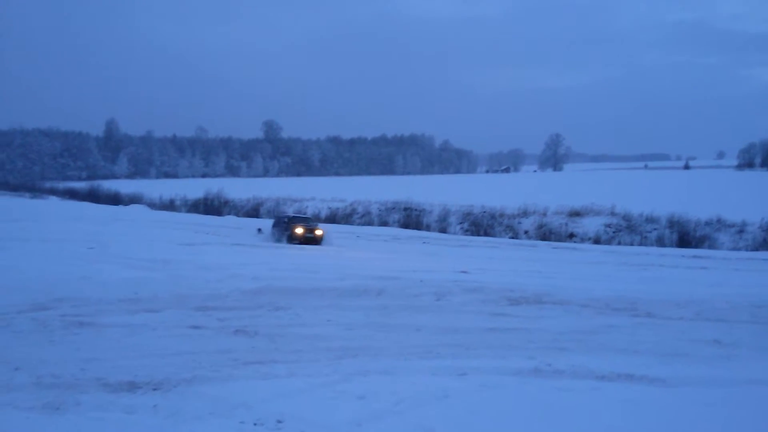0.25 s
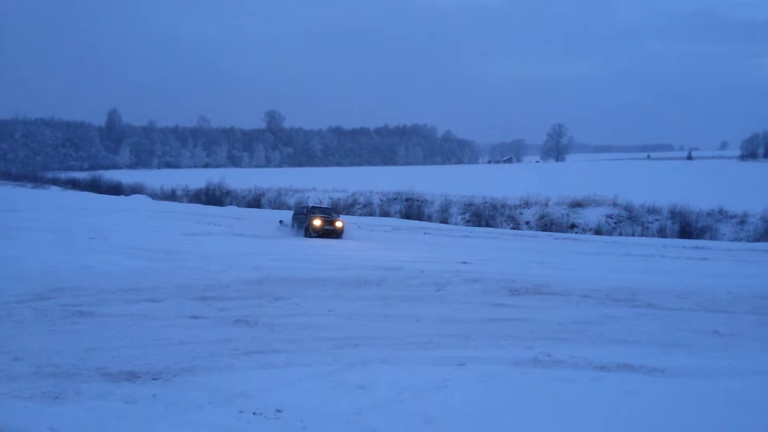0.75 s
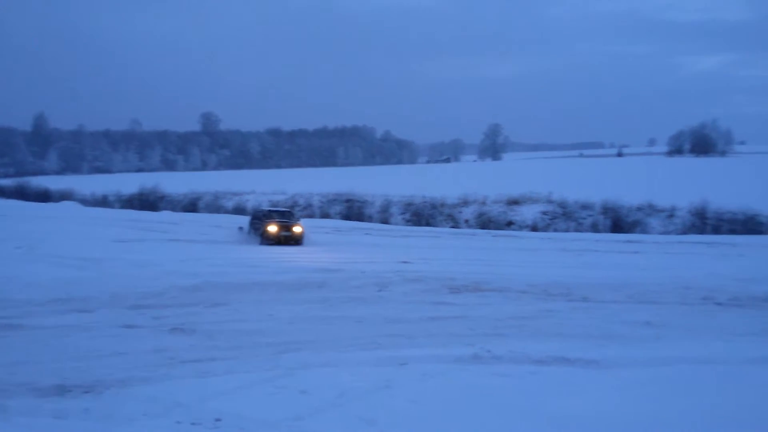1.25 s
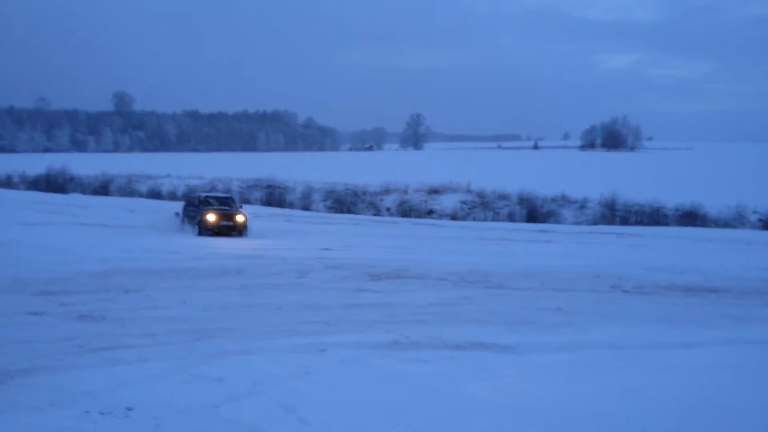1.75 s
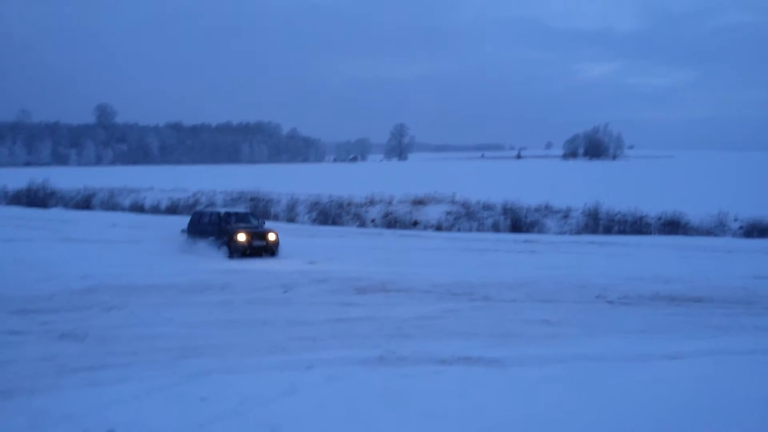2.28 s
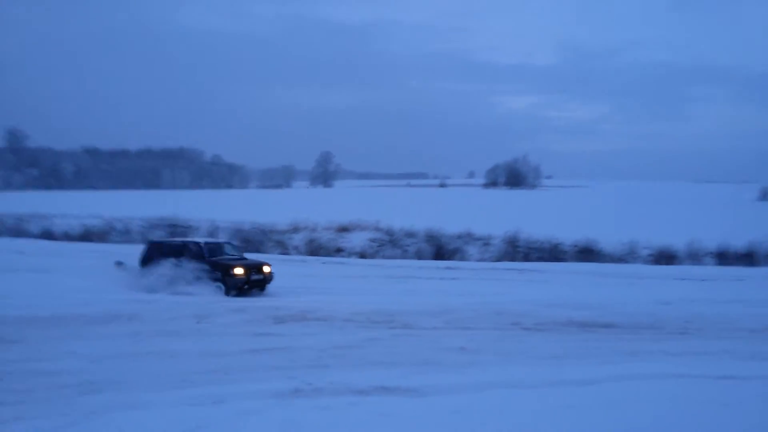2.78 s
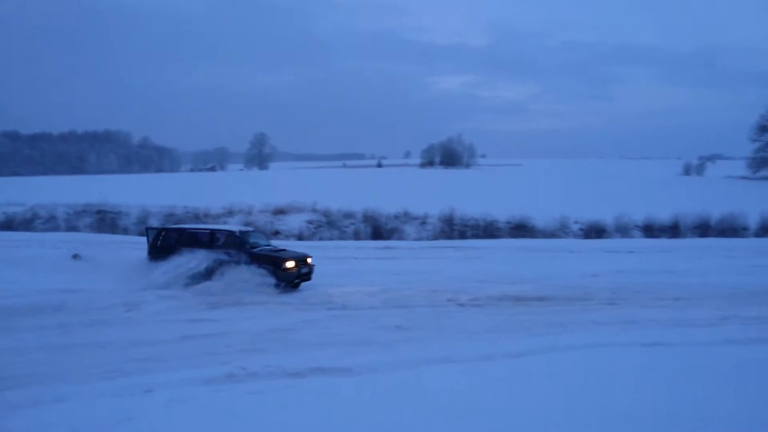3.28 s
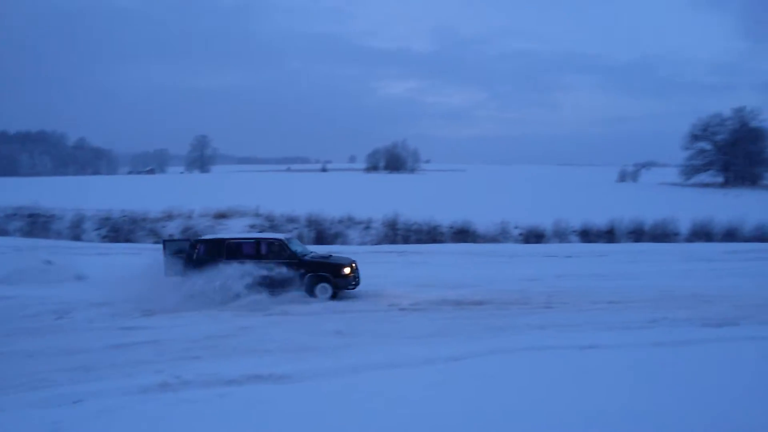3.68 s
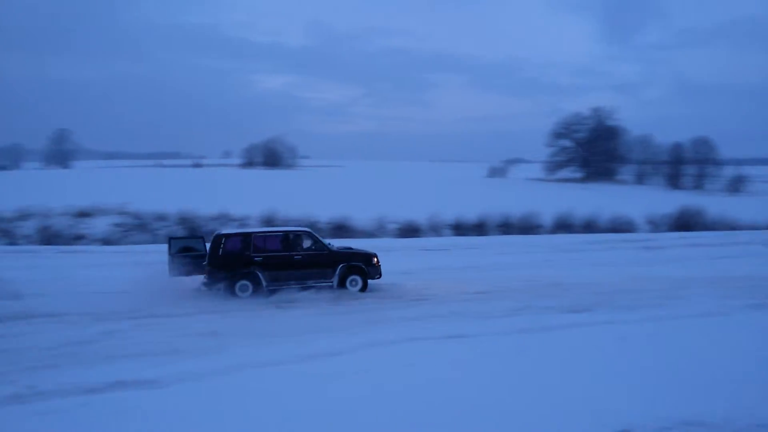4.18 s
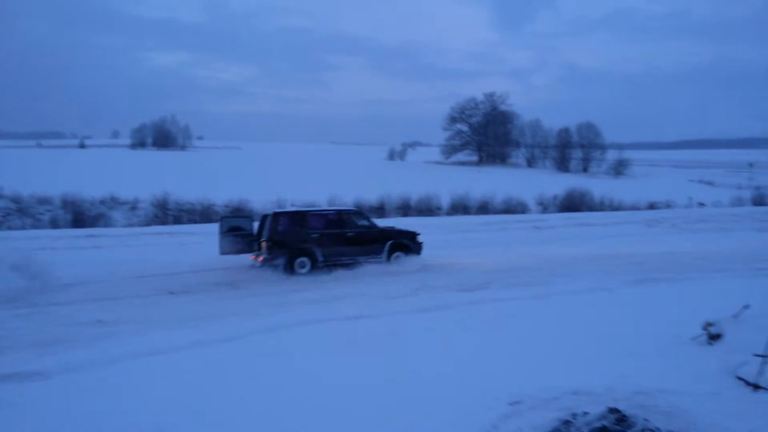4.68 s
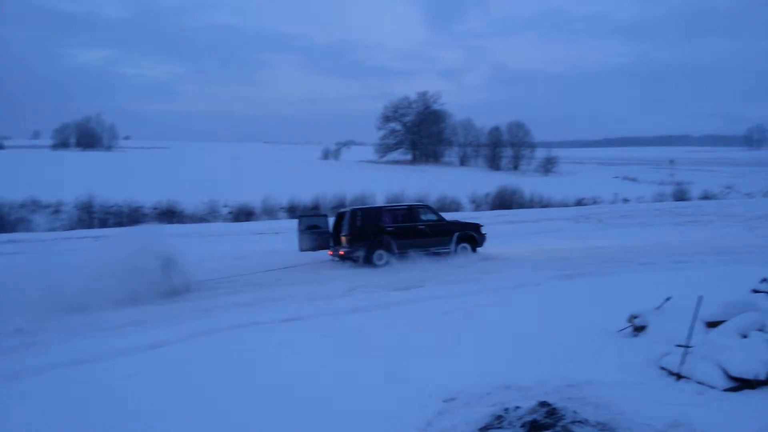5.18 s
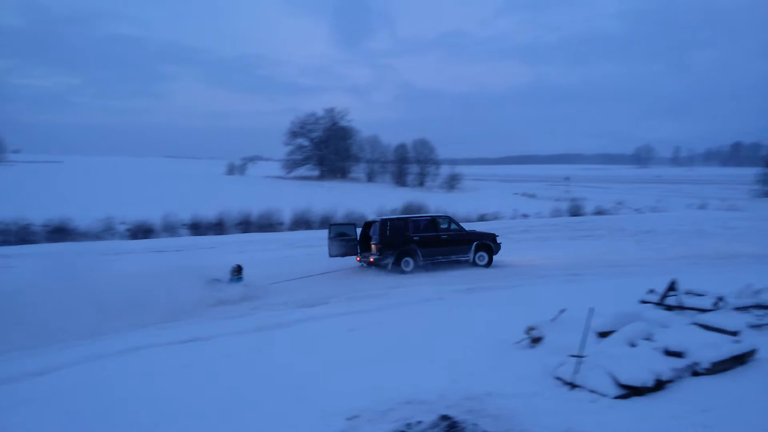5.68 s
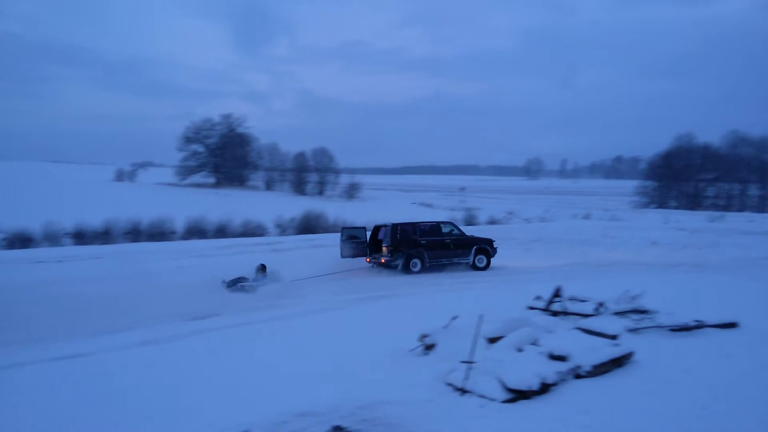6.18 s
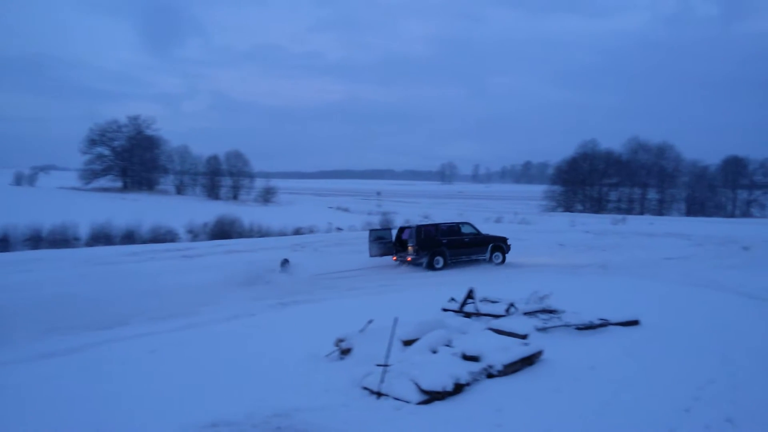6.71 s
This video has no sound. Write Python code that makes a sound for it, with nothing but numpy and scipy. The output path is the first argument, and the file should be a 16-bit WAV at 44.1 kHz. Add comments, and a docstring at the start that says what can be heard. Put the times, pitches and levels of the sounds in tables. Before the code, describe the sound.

An off-road car drones closer across a snowy field, clattering and churning snow, then pulls away with a rasping exhaust as wind buffets the microphone.

```python
"""A snowy field, with an off-road car driving past a hand-held camera.
The car drones closer as multiples of its firing rate, its wheels churning snow as noise that puffs with
each firing, and clatters as short metallic modes. It eases off twice, and pulls away with a rasping exhaust,
gas noise through resonances, before easing off again. Gusts of low noise buffet and thump the microphone;
open air lies behind, and the camera adds a thin high hiss and a few ticks."""
import sys
import numpy as np
from scipy import signal
from scipy.fft import rfft, irfft
from scipy.io import wavfile
from scipy.ndimage import map_coordinates

SR = 44100
rng = np.random.default_rng(int(sys.argv[2]) if len(sys.argv) > 2 else 0)


def transcribe(u):
    """Save the signal u as a 16-bit wav file named by the first command-line argument.

    u: samples, shape (n,) or (channels, n), limited to [-1, 1]; the rate is SR.
    q: integer samples, one column per channel.
    """
    v = np.clip(np.atleast_2d(u).T, -1, 1)
    q = np.round(v * 32767).astype(np.int16)
    wavfile.write(sys.argv[1], SR, q)


N = 306450
TIME = np.arange(N) / SR
BINS = np.fft.rfftfreq(N, 1 / SR)

# Metal parts of the car that ring when knocked.
# Each row: pitch in Hz, relative level in dB, time to fall by 60 dB in seconds.
METAL_MODES = [(1460, -7.5, 0.0068), (1870, -8.5, 0.014), (2320, 4, 0.02), (2437, 13.5, 0.018),
               (2620, 5, 0.032), (3190, 1, .016), (3570, 1, 0.015)]
# Which microphone port the wind strikes harder. Each row: time in seconds, left minus right in dB.
WIND_SIDE = [(0, 21), (1.35, -23), (4.55, -2.5), (5.3, 9), (5.85, -0.5), (6.5, 7.5), (6.95, 6)]
FRESHEN_S, BLOWING_S = 1.94, 5.92  # the wind begins to freshen, and reaches its steady blow


def amp(db):
    """Decibels to gain."""
    return 10 ** (np.asarray(db) / 20)


def evened(x):
    """Scales to rms 1."""
    return x / np.sqrt(np.mean(x ** 2) + 1e-20)


def curves(rows):
    """Each column of a table of times, joined by straight lines."""
    s, *columns = np.transpose(rows)
    return [np.interp(TIME, s, column) for column in columns]


def read(points):
    """A table of (Hz, value) on the frequency bins, joined by straight lines over log frequency."""
    hz, value = np.transpose(points)
    return np.interp(np.log(BINS + 1), np.log(hz + 1), value)


def colour(x, gain):
    """Filters by a gain per bin, at rms 1."""
    return evened(irfft(rfft(x) * gain, N))


def wander(per_s):
    """Smooth chance of rms 1, up to about the given rate."""
    return colour(rng.standard_normal(N), np.exp(-(BINS / per_s) ** 2))


def add(mix, s, sound):
    """Mixes a sound in at a time."""
    part = mix[max(round(s * SR), 0):][:len(sound)]
    part += sound[:len(part)]


def swells(events):
    """One smooth bump of height 1 per row: centre in seconds, seconds from there to 1/e, then others."""
    return np.array([np.exp(-((TIME - s) / length) ** 2) for s, length, *_ in events])


def resonances(modes):
    """Gain per bin of steep resonances; each row: Hz, half-width at -6 dB in Hz, level in dB."""
    powers = [amp(db) ** 2 / (1 + ((BINS - hz) / width) ** 2) ** 2 for hz, width, db in modes]
    return np.sqrt(sum(powers))


def resonate(x, hz, width):
    """A steep resonance of gain 1 that follows the curve hz, by shifting that pitch to zero and back."""
    turn = np.exp(2j * np.pi * np.cumsum(hz) / SR)
    r = np.exp(-np.pi * width / SR)
    smoothed = signal.lfilter([(1 - r) ** 2], [1, -2 * r, r * r], x * turn.conj())
    return 2 * (turn * smoothed).real


def narrow_swells(x, rows, width_hz):
    """Narrow bands of a noise that swell and fade; each row: centre s, seconds to 1/e, dB, Hz."""
    out = 0
    for swell, (_, _, db, hz) in zip(swells(rows), rows):
        out = out + amp(db) * swell * colour(x, resonances([(hz, width_hz / 2, 0)]))
    return out


def noise_pair():
    """White noise at the two microphone ports, less alike in the treble."""
    # Each row: frequency in Hz, left-right likeness from 0 to 1.
    likeness = [(60, 0.99), (300, 0.91), (700, 0.88), (1400, 0.82), (2200, 0.49), (3200, 0.47),
                (6500, 0.042)]
    a, b = rfft(rng.standard_normal((2, N)))
    same = np.clip(read(likeness), -1, 1)
    return irfft(np.array([a, same * a + np.sqrt(1 - same ** 2) * b]), N)


def passing():
    """The straight drive past: dB from distance, and aspect from -1 (head on) to 1 (from behind)."""
    nearest_s, pass_per_s = 3.92, 0.53  # time of the nearest point; speed in nearest distances per second
    along = pass_per_s * (TIME - nearest_s)
    distance = np.hypot(1, along)
    return -20 * np.log10(distance), along / distance


def throttle():
    """How far the throttle is shut, and how much power is still missing after it reopens (0-1 each)."""
    # The driver lifts off. Each row: start, end in seconds.
    lifts = [(3.53, 3.83), (5.172, 5.41), (6.862, 7.1)]
    close_s, open_s, rebuild_s = 0.054, 0.054, 0.18
    shut, lag = np.zeros(N), np.zeros(N)
    for start, end in lifts:
        closing = np.clip((TIME - start) / close_s, 0, 1)
        since = np.maximum(TIME - end, 0)
        shut += closing * np.clip(1 - since / open_s, 0, 1)
        lag += closing * np.exp(-(since / rebuild_s) ** 4)
    return shut, lag


def heard(abeam_db, astern_db, shut_db, lag_db):
    """Level in dB of one voice of the car: its level abeam, changed by distance, aspect and throttle."""
    distance_db, aspect = passing()
    shut, lag = throttle()
    return abeam_db + distance_db + astern_db * aspect + shut_db * shut + lag_db * lag


def puffs(turns, depth, uneven_db):
    """One swell per firing; sizes follow a cycle of four firings, and every stroke differs by chance."""
    stroke = turns.astype(int)
    size_db = uneven_db * (np.cos(np.pi * stroke / 2) + rng.uniform(-3, 0, N)[stroke])
    return evened(1 + depth * amp(size_db) * np.sin(np.pi * turns) ** 4)


def drone(turns):
    """The firing tone and its multiples, firm under load; most waver more in wind and off the throttle."""
    # The firing tone under load. Each row: time in seconds, rms level in dB.
    first_level = [(0.0, -40), (0.2, -35), (2.07, -35.5), (2.45, -30), (2.8, -31), (3.2, -32), (3.5, -34),
                   (3.82, -41), (3.9, -30.5), (4.15, -35), (4.55, -29), (4.7, -35), (4.8, -46), (4.88, -29),
                   (5.1, -48), (5.44, -42), (5.52, -37), (5.85, -37.5), (6.1, -35), (6.4, -41),
                   (6.68, -29.5), (6.85, -58), (6.95, -56)]
    # The octave above it. Each row: time in seconds, rms level in dB.
    octave_level = [(0, -54), (1.2, -47.5), (2, -44), (3.2, -42.5), (3.45, -37), (3.6, -44.5), (3.8, -44.5),
                    (3.9, -34.5), (4.2, -34.5), (4.5, -33), (4.95, -32.5), (5.15, -36), (5.22, -43),
                    (5.3, -37), (5.42, -44), (5.5, -31), (5.68, -29.5), (5.85, -33), (6.6, -34),
                    (6.95, -42.5)]
    # Weaker engine orders. Each row: multiple of the firing rate, dB against the octave.
    overtones = [(2.25, -16), (2.5, -21.5), (3, -20), (5, -30), (5.25, -24), (5.5, -18.5), (5.75, -24.5),
                 (6.25, -25), (7.5, -29), (9, -30.5)]
    # The third harmonic sings out: centre in seconds, seconds to 1/e, peak rms level in dB.
    third_swell = (4.686, 0.23, -48)
    # Throb between the firing tone and its octave: multiple of the firing rate, dB against that tone.
    throb_order = (1.5, -6.5)
    first_db, octave_db = curves(first_level)[0], curves(octave_level)[0]
    angle, overrun = 2 * np.pi * turns, throttle()[0]
    windy = np.clip((TIME - FRESHEN_S) / (BLOWING_S - FRESHEN_S), 0, 1) ** 0.67
    waver_db = .35 + .7 * windy + 1.5 * overrun
    slip = .12 * windy + .3 * overrun  # radians
    firing = amp(first_db - 2 * overrun + waver_db * wander(28)) * np.cos(angle + slip * wander(32))
    octave = amp(octave_db + waver_db * wander(14)) * np.cos(2 * angle + slip * wander(12))
    third = amp(third_swell[2]) * swells([third_swell])[0] * np.cos(3 * angle + slip * wander(12))
    multiple, throb_db = throb_order
    throb = windy * amp(first_db + throb_db + 4.26 * wander(23)) * np.cos(multiple * angle + wander(36))
    upper = 0
    for k, db in overtones:
        phase = (0.3 + .55 * windy) * wander(12) + 2 * np.pi * rng.random()
        upper = upper + amp(db + 3.6 * wander(13)) * np.cos(k * angle + phase)
    return np.sqrt(2) * (firing + octave + third + throb + amp(octave_db) * upper)


def gas_flow(turns, steady):
    """Exhaust turbulence, part of which repeats with each engine cycle of four firings."""
    cycle = rng.standard_normal(2048)
    repeating = map_coordinates(cycle, [turns / 4 * len(cycle)], order=3, mode="grid-wrap")
    share = np.clip(steady / (1 + (BINS / 3800) ** 2), 0, 1)
    return irfft(np.sqrt(share) * rfft(repeating) + np.sqrt(1 - share) * rfft(noise_pair()), N)


def exhaust(turns):
    """Puffs of gas boom in the silencer, ring the pipe, set off a gliding whine and roar at the mouth."""
    # Silencer resonances. Each row: pitch in Hz, half-width at -6 dB in Hz, relative level in dB.
    silencer = [(345, 35, -15), (426, 28, 0), (475, 33, -12), (590, 45, -7.5)]
    # Pipe resonances before drift. Each row: pitch in Hz, half-width at -6 dB in Hz, relative level in dB.
    pipe_modes = [(687.4, 36, 4), (999, 60, 5), (1119, 57, 4.5), (1428, 44, 7), (1565, 34, 6),
                  (1635, 70, 3.5)]
    # How strongly the pipe rings. Each row: time in seconds, level in dB.
    rasp_level = [(0, -63), (3.8, -59), (4.25, -54), (4.55, -45), (5.0, -42.5), (5.19, -46.5), (5.29, -62),
                  (5.41, -59), (5.45, -48), (5.85, -46), (5.97, -41.5), (6.45, -44.5), (6.6, -43.5),
                  (6.86, -43.5), (6.93, -53)]
    # The whine, before its waver and trim. Each row: time in seconds, pitch in Hz, level in dB.
    whine_glide = [(2.3, 1523, -74.5), (3.0, 1522, -52.5), (3.3, 1447, -50), (3.5, 1510, -54),
                   (3.7, 1450, -68), (4.3, 1520, -53), (4.41, 1530, -43.5), (4.52, 1504, -53),
                   (4.78, 1553, -53), (5.0, 1606, -57.5), (5.16, 1550, -64), (5.25, 1490, -61),
                   (5.42, 1520, -64), (5.5, 1520, -51), (5.85, 1540, -52), (5.94, 1514, -34),
                   (6.02, 1590, -60), (6.1, 1505, -34), (6.17, 1527, -53), (6.32, 1495, -51),
                   (6.41, 1497, -39), (6.5, 1517, -51), (6.56, 1550, -34.5), (6.61, 1590, -48.5),
                   (6.65, 1564, -32.5), (6.69, 1614, -50.5), (6.85, 1600, -57), (6.95, 1496, -60)]
    # Colour of the roar at the mouth. Each row: frequency in Hz, relative level in dB per Hz.
    mouth_colour = [(700, -22.5), (1500, -22), (1780, 1), (1960, 6), (2100, 2.5), (2270, 6.5), (2450, -4),
                    (2700, -0.5), (2950, -5.5), (3200, -3.5), (3750, -14.5), (4400, -10.5), (5200, -19),
                    (6300, -23), (7500, -88)]
    # Level of that roar. Each row: time in seconds, level in dB.
    roar_level = [(0, -83), (3.9, -66.5), (4.4, -53.5), (4.75, -50), (5.0, -45), (5.17, -49), (5.25, -60),
                  (5.415, -62.5), (5.45, -46), (5.68, -50), (5.83, -46), (6.2, -42.5), (6.45, -43.5),
                  (6.68, -44.5), (6.87, -43.5), (6.93, -54)]
    # Brief flares at one pitch. Each row: centre in seconds, seconds to 1/e, level in dB, pitch in Hz.
    flare_rows = [(4.65, 0.14, -57, 1470), (4.27, 0.067, -53.5, 417), (4.81, 0.047, -45, 430),
                  (5.57, 0.15, -52.5, 600), (5.815, .02, -48, 2150), (5.88, 0.012, -44.5, 1983),
                  (6.073, 0.021, -45, 2159), (6.448, 0.03, -41.5, 1440), (6.774, .07, -54, 3248)]
    pipe_drift, whine_waver = 0.0078, 0.011  # rms shares of the pitch
    whine_trim_db = -3.5

    gas = gas_flow(turns + .01 * wander(9), steady=.85) * puffs(turns, depth=.7, uneven_db=2.6)
    pipe = 0
    for hz, width, db in pipe_modes:
        drifting_hz = hz * (1 + pipe_drift * wander(6.8))
        pipe = pipe + amp(db + 2 * wander(10)) * resonate(gas, drifting_hz, 2 * width)
    ring = amp(curves(rasp_level)[0] + 0.87 * wander(21)) * evened(pipe)
    boom_db = heard(abeam_db=-49.5, astern_db=8.5, shut_db=-8.0, lag_db=-5.0)
    boom = amp(boom_db) * colour(gas, resonances(silencer))
    whine_hz, whine_db = curves(whine_glide)
    whine = evened(resonate(gas, whine_hz * (1 + whine_waver * wander(16.0)), width=87))
    whine *= amp(whine_db + whine_trim_db + 1.7 * wander(21))
    roar = amp(curves(roar_level)[0] + .5 * wander(14)) * colour(gas, amp(read(mouth_colour)))
    flaring = narrow_swells(gas, flare_rows, width_hz=250)
    beat = evened(1 + .1 * np.cos(2 * np.pi * turns - np.pi) + .12 * np.cos(4 * np.pi * turns))
    return boom + (ring + whine) * beat + roar + flaring


def spinning():
    """The dB that the spinning wheels add to the churn."""
    # Each row: centre in seconds, seconds to 1/e, dB added.
    wheelspins = [(2.46, 0.58, 5), (3.06, 0.23, 2.5), (3.525, 0.18, 3.5)]
    return np.transpose(wheelspins)[2] @ swells(wheelspins)


def churn(turns):
    """Engine roar and thrown snow as puffing noise, louder in wheelspin, with a rumble in deep snow."""
    # Seen from the front. Each row: frequency in Hz, relative level in dB per Hz.
    front_colour = [(40, -41), (170, 1.5), (290, -9.5), (400, -1), (540, -7.5), (660, 0), (780, -6),
                    (1130, -8.5), (1300, -22), (1500, -15), (1720, -16.5), (1900, -12.5), (2450, -16),
                    (3200, -21.5), (4700, -23.5), (7500, -64)]
    # Seen from behind. Each row: frequency in Hz, relative level in dB per Hz.
    rear_colour = [(40, -47), (260, 5), (400, 10), (500, 2), (600, 6.5), (700, 4.5), (820, -0.5),
                   (1100, -0.5), (1280, -10.5), (2200, -9), (3200, -43), (5000, -47), (6200, -42),
                   (7500, -103)]
    # Wheels in deep snow: centre in seconds, seconds to 1/e, level in dB, top of the band in Hz.
    deep_snow = (3.55, 0.95, -50.5, 331)
    grit = noise_pair() * puffs(turns, depth=.55, uneven_db=3) * amp(1.4 * wander(40))
    behind = np.clip((TIME - 3.6) / 0.12, 0, 1)  # the colour turns just before the nearest point
    front, rear = colour(grit, amp(read(front_colour))), colour(grit, amp(read(rear_colour)))
    level_db = heard(abeam_db=-46.0, astern_db=1.5, shut_db=0.5, lag_db=-0.5) + spinning()
    s, length, rumble_db, top_hz = deep_snow
    band = (BINS / 120) ** 2 / (1 + (BINS / 120) ** 2) / (1 + (BINS / top_hz) ** 6)
    rumble = amp(rumble_db) * swells([(s, length)]) * colour(noise_pair(), band)
    return amp(level_db) * ((1 - behind) * front + behind * rear) + rumble


def spray_and_soft_thump():
    """Dense, crunching grains: a soft, dull thump of wind at the microphone, then clods off the tyres."""
    # First the wind thump, then the snow. Each row: centre in seconds, seconds to 1/e, level in dB.
    bursts = [(0.162, 0.025, -55), (2.44, 0.026, -47), (2.64, .04, -48.5), (3.018, 0.021, -40),
              (3.086, 0.028, -42), (3.149, 0.022, -39.5), (3.194, 0.028, -38.5), (3.331, 0.024, -53),
              (3.461, 0.035, -43)]
    # Colour of both. Each row: frequency in Hz, relative level in dB per Hz.
    grain_colour = [(150, -23), (380, 14.5), (560, 5), (900, 2), (1150, 10), (1290, -14.5), (1500, 4),
                    (1720, -27), (1900, -9), (3500, -31), (6500, -85)]
    wind_thump, snow_clods = bursts[:1], bursts[1:]
    grains_per_s = 1400
    sizes = rng.standard_normal(N) * amp(3 * np.minimum(rng.exponential(1, N), 3))
    grains = colour((rng.random(N) < grains_per_s / SR) * sizes, amp(read(grain_colour)))
    soft_thump = amp(np.transpose(wind_thump)[2]) @ swells(wind_thump) * grains
    thrown_snow = amp(np.transpose(snow_clods)[2]) @ swells(snow_clods) * grains
    return soft_thump + thrown_snow


def clatter():
    """Short metallic knocks, and one low thud of a snow clod: a wide crack together with ringing modes."""
    # The one pitched far down is the snow clod. Each row: start in seconds, peak level in dB, pitch as a ratio.
    knocks = [(0.87, -45, 1), (1.43, -50, 1.04), (1.555, -43, 1.06), (1.755, -49, 1.09),
              (1.8432, -44, 0.99), (2.1398, -48.5, 1.05), (2.712, -41, 1.03), (2.817, -43, 0.98),
              (3.003, -37, 1), (3.023, -40, 1.08), (3.063, -39, .96), (3.0895, -39, 0.97),
              (3.2083, -37, 0.97), (3.2268, -37, 1.01), (3.2412, -38, 0.96), (3.251, -39, 1),
              (3.302, -44, 0.94), (3.3248, -36.5, 0.98), (3.344, -39, 1), (3.368, -42, 1.1),
              (3.422, -35.5, .94), (3.459, -36, 1), (3.473, -42, 1.04), (3.482, -46, 1.1),
              (3.506, -30, 1.02), (3.531, -36, 1.05), (3.5816, -38, 1.03), (3.588, -34, 0.99),
              (3.613, -39, 0.99), (3.66, -42, 1), (3.691, -38, 0.88), (3.763, -45.5, 0.95),
              (3.816, -33.5, 0.358), (3.897, -43, 1.03), (4.189, -44, 0.98), (4.366, -42, 0.97)]
    t, out = np.arange(SR // 20) / SR, np.zeros(N)
    crack = colour(rng.standard_normal(N), 1 / (1 + ((BINS - 2500) / 1400) ** 6))
    chances = rng.standard_normal((len(knocks), len(METAL_MODES), 2))  # each is struck a little differently
    for (s, db, pitch), chance in zip(knocks, chances):
        ring = amp(1) * crack[round(s * SR):][:len(t)] * np.exp(-t / .0035)
        for (hz, level, t60), (detune, phase) in zip(METAL_MODES, chance):
            struck_hz = hz * pitch * (1 + 0.017 * detune)
            ring += amp(level - 60 * t / t60) * np.sin(2 * np.pi * (struck_hz * t + phase))
        ring *= 1 - np.exp(-t / .0016)  # soft onset
        add(out, s, amp(db) * ring / abs(ring).max())
    return out


def rattle():
    """Many small knocks at random, coloured by the metal modes; they swell as the car nears and in a flurry."""
    knocks_per_s, decay_s = 130, 0.0032
    level_db, flurry_db, flurry_s, flurry_length_s = -63.5, 4, 3.5, 0.13  # level abeam, without the flurry
    knocks = (rng.random(N) < knocks_per_s / SR) * amp(3.5 * np.minimum(rng.exponential(1, N), 3))
    bursts = signal.lfilter([1], [1, -np.exp(-1 / (decay_s * SR))], knocks) * rng.standard_normal(N)
    body = sum(amp(db) / (1 + ((BINS - hz) / 260) ** 2) for hz, db, t60 in METAL_MODES)
    flurry = np.exp(-((TIME - flurry_s) / flurry_length_s) ** 2)
    return amp(level_db + 0.53 * passing()[0] + flurry_db * flurry) * colour(bursts, body)


def whistle():
    """A thin, wavering tone from the distant car that swells and fades."""
    # Start and end in seconds, mean pitch in Hz, peak level in dB before it wavers.
    tone = (0.45, 1.75, 3365, -69.5)
    start, end, hz, db = tone
    progress = np.clip((TIME - start) / (end - start), 0, 1)
    swell = np.sqrt(np.clip(np.sin(np.pi * progress), 0, 1))
    pitch = hz * (1 + .005 * wander(7) + .009 * wander(60))
    return amp(db + 2.5 * wander(31)) * swell * np.sin(2 * np.pi * np.cumsum(pitch) / SR)


def wind():
    """Lumpy turbulence, separate at each port; a stronger blow and single gusts reach higher."""
    # Colour of a strong blow. Each row: frequency in Hz, relative level in dB per Hz.
    buffet_colour = [(20, -37.5), (35, -34.5), (50, -4), (65, 0.5), (130, -4.5), (200, -2), (300, -21.5),
                     (400, -21.5), (600, -30), (1200, -40), (3000, -81.5)]
    # Gusts. Each row: centre in seconds, seconds to 1/e, level in dB before it leans to one port.
    gusts = [(0.74, 0.023, -54), (1.35, 0.058, -43), (3.602, 0.051, -61), (4.548, 0.08, -31),
             (4.663, .03, -38), (4.863, 0.083, -39), (5.29, 0.012, -44), (5.447, 0.018, -31.5),
             (5.678, 0.041, -31), (5.84, 0.028, -28), (5.9, 0.025, -27), (6.013, 0.012, -21.5),
             (6.273, 0.016, -29), (6.473, 0.045, -26.5), (6.609, 0.055, -31), (6.699, 0.029, -28),
             (6.763, 0.045, -26), (6.898, 0.059, -31)]
    # Colour of the gusts. Each row: frequency in Hz, relative level in dB per Hz.
    gust_colour = [(30, -37), (60, -1.5), (130, 8), (220, 2), (330, -6), (430, -15), (650, -34.5),
                   (3000, -98.5)]
    calm_db, blow_db = -60.5, -32.5
    breeze_db = np.interp(TIME, [FRESHEN_S, BLOWING_S], [calm_db, blow_db])
    side_db = curves(WIND_SIDE)[0]
    eddies = rng.standard_normal((2, N)) * amp(2.4 * np.array([wander(25), wander(25)]))
    strong = colour(eddies, amp(read(buffet_colour)))
    gentle = colour(eddies, amp(read(buffet_colour)) / (1 + (BINS / 140) ** 2))
    force = np.clip((breeze_db + 38.5) / 12, 0, 1)
    rumble = amp(breeze_db) * (force * strong + (1 - force) * gentle)
    hits = amp(np.transpose(gusts)[2]) @ swells(gusts)
    blasts = hits * colour(rng.standard_normal((2, N)), amp(read(gust_colour)))
    return (rumble + blasts) * amp(np.array([side_db, -side_db]) / 2)


def thumps():
    """Quickly damped thumps at the microphone, some dull and some sharp, stronger on the windward side."""
    # Each row: start in seconds, envelope peak in dB before it leans to one port, Hz, seconds to the peak.
    blows = [(1.295, -27, 129, .0052), (1.309, -28, 124, 0.0073), (1.359, -40, 200, 0.004),
             (1.378, -25, 176, 0.0021), (3.008, -39, 270, 0.0034), (3.708, -37.5, 261, .006),
             (4.531, -18.5, 175, 0.0035), (5.267, -24, 152, 0.0053)]
    t, out = np.arange(SR // 10) / SR, np.zeros(N)
    for s, db, hz, rise in blows:
        envelope = (t / rise) ** 2 * np.exp(2 - 2 * t / rise)
        add(out, s, amp(db) * envelope * np.sin(2 * np.pi * hz * t))
    side_db = curves(WIND_SIDE)[0]
    return out * amp(np.array([side_db, -side_db]) * 0.39)


def air():
    """The steady background of the open field, as coloured noise."""
    # Each row: frequency in Hz, relative level in dB per Hz.
    field_colour = [(20, -32), (35, -13.5), (55, 14.5), (100, 13), (170, -8.5), (330, -11.5), (450, -6.5),
                    (1050, -17), (1350, -10.5), (1650, -18.5), (2400, -19), (3800, -24), (5500, -27),
                    (7500, -104.5)]
    return amp(-44.0) * colour(noise_pair(), amp(read(field_colour)))


def camera():
    """A grainy hiss and small damped ticks in the camera body, nearer the right port."""
    # The hiss before each port's own level. Each row: time in seconds, level in dB.
    hiss_level = [(0.0, -53.5), (0.25, -50), (0.75, -59.5), (1.82, -49.5), (1.88, -41), (1.97, -50),
                  (2.44, -42), (2.69, -52.5), (2.94, -50.5), (4.02, -57.5), (4.93, -51.5), (5.26, -59),
                  (5.85, -56.5), (5.88, -46.5), (5.9, -52.5), (6.13, -50.5), (6.85, -53.5), (6.95, -58)]
    # Its colour at the left port. Each row: frequency in Hz, relative level in dB per Hz.
    left_colour = [(7500, -36), (8500, -22), (9400, -19), (10000, -11), (10800, -5), (11600, 0),
                   (12300, -2), (13000, -5), (14500, -7)]
    # Its colour at the right port. Each row: frequency in Hz, relative level in dB per Hz.
    right_colour = [(7500, -48), (8500, -32), (9400, -22), (10000, -16), (10600, -6), (11050, 0),
                    (11700, -2), (12300, -9), (13000, -13), (14500, -17)]
    # Pitches that stand out. Each row: centre in seconds, seconds to 1/e, dB at the right port, Hz.
    hiss_rings = [(1.4, 0.48, -66, 10900), (2.95, .3, -55.5, 11460), (3.15, 0.41, -55.5, 11080)]
    # Each row: start in seconds, peak in dB before the high-pass and the balance of the ports.
    tick_rows = [(0.1935, -40), (0.5433, -38), (3.7938, -44), (3.9236, -37), (4.256, -35), (5.858, -31),
                 (5.8835, -23), (5.8864, -37)]
    left_mean_db, left_share, right_boost_db = -56.5, 0.64, 4.5  # the left gets a share of the swing in dB

    grain = rng.standard_normal((2, N)) * amp(1.2 * wander(140) + .5 * wander(23))
    left = colour(grain[0], amp(read(left_colour)))
    right = colour(grain[1], amp(read(right_colour)))
    hiss_db = curves(hiss_level)[0]
    swing_db = hiss_db - hiss_db.mean()
    left *= amp(left_mean_db + left_share * swing_db)
    right *= amp(hiss_db + right_boost_db)
    hiss = np.array([left, right])
    hiss += narrow_swells(grain[1], hiss_rings, width_hz=67) * amp([[-9], [0]])

    t, ticks = np.arange(SR // 100) / SR, np.zeros(N)
    tick = np.sin(2 * np.pi * 11250 * t) * (np.exp(-t / .0006) - np.exp(-t / .00015))
    tick += .4 * np.sin(2 * np.pi * 13600 * t) * np.exp(-t / .0003)
    for s, db in tick_rows:
        add(ticks, s, amp(db) * tick / abs(tick).max())
    ticks = signal.sosfilt(signal.butter(6, 9500, "highpass", fs=SR, output="sos"), ticks)
    return hiss + ticks * amp([[-4], [2.5]])


def scene():
    """The car, a little left of centre, in wind and open air."""
    # Engine speed. Each row: time in seconds, firing rate in Hz.
    firing_rate = [(0, 80.5), (0.25, 80.2), (0.45, 77.86), (0.7, 77.54), (1, 78.1), (1.38, 79.2),
                   (1.58, 75.43), (1.78, 76.02), (2.02, 75.98), (2.25, 77.7), (2.8, 79.47), (3.1, 81.34),
                   (3.3, 84.02), (3.55, 87.74), (3.66, 85.37), (3.74, 69.84), (3.82, 74.14), (4.02, 77.45),
                   (4.5, 78.5), (4.75, 80.55), (5.07, 81.04), (5.17, 77.05), (5.3, 66.6), (5.36, 66.5),
                   (5.48, 78.62), (5.79, 78.18), (6, 82.4), (6.3, 80.97), (6.64, 85.1), (6.73, 79.8),
                   (6.84, 85.8), (6.95, 82.8)]
    # The camera body delays one port unevenly. Each row: frequency in Hz, radians by which left leads.
    port_phase = [(1500, 0), (2000, 0.8), (2250, 0.43), (2600, 0.2), (3000, 0.7), (4050, 0.4), (4800, 0.48)]
    turns = np.cumsum(curves(firing_rate)[0]) / SR  # firings so far
    engine = drone(turns) + exhaust(turns)
    left, right = engine + churn(turns) + spray_and_soft_thump() + clatter() + rattle()
    lag_ms = np.interp(TIME, [0, 2, 4.7, 5.8], [.05, .09, .07, .005])
    right = np.interp(TIME - lag_ms / 1000, TIME, right)
    right = irfft(rfft(right) * np.exp(-1j * read(port_phase)), N)
    return np.array([left, right]) + whistle() + wind() + thumps() + air() + camera()


def record(dry):
    """The recorder's band limit, a steep low-pass."""
    edge_hz = 14620
    low_pass = signal.firwin(511, edge_hz, window=("kaiser", 9), fs=SR)
    return signal.oaconvolve(dry, low_pass[None], "same")


dry = scene()
out = record(dry)
transcribe(out)
```